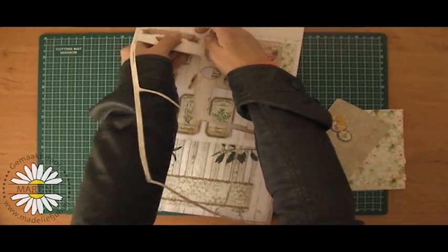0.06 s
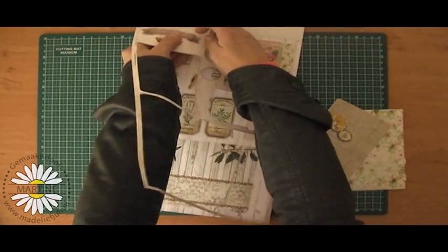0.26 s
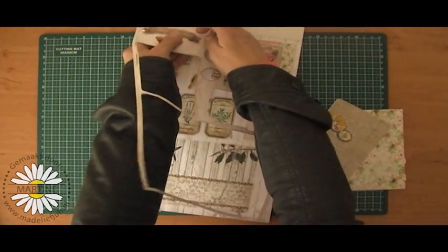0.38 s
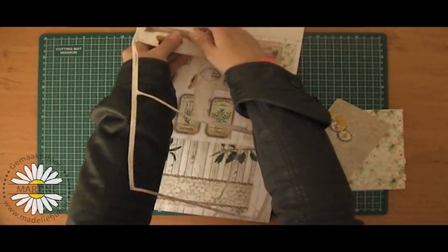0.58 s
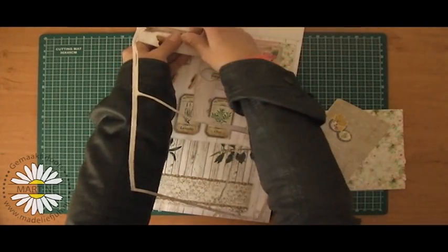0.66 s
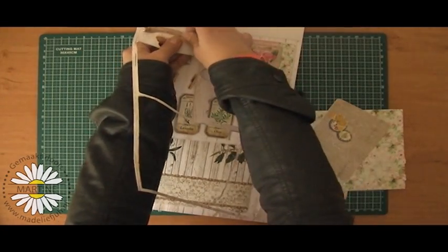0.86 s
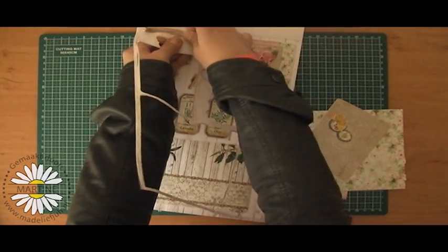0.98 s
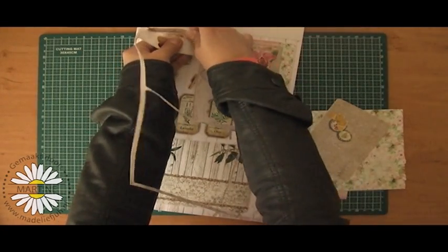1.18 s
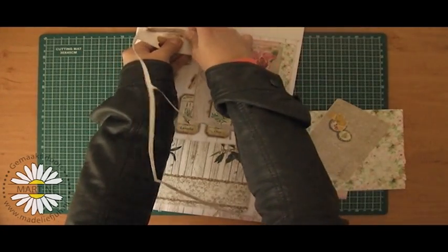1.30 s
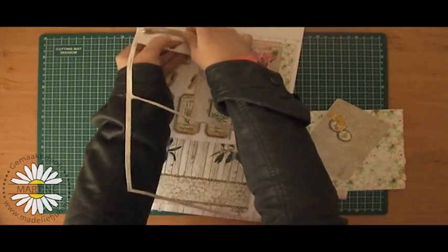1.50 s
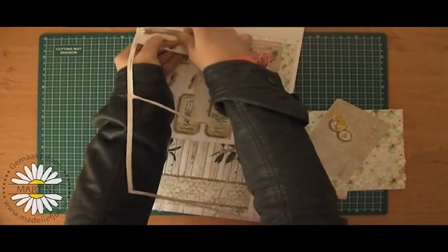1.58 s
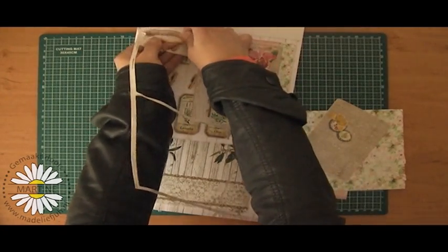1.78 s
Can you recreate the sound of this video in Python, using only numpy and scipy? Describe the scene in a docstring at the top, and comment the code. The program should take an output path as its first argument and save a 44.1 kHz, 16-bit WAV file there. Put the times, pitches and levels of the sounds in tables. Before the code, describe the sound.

Card tabs snapping from a die-cut sheet, close and dry in a small room. Faint rubbing and ticks lead to a volley of loud, bright snaps from 0.23 to 0.42 seconds, with soft thumps. Small ticks at 0.55, 0.71 and 0.95, a quieter snap cluster at 1.08 to 1.17, then a soft rub from 1.38 ending in ticks at 1.48. Sparse faint ticks finish over light hiss and low hum.

```python
"""Faint card rubbing and ticks come first, then from 0.23 s a volley of loud snaps with soft thumps.
Sparse ticks follow, a second snap group near 1.08 s, then a rub that ends in ticks near 1.48 s.
Fingers push card pieces out of a die-cut sheet on a craft table: snaps are coloured noise bursts with echoes
and a small room, rubs are shaped noise, scrapes are narrow-band noise, thumps are decaying sines on the mat.
Faint hiss and a wavering hum run throughout."""
import sys
import numpy as np
from scipy import signal
from scipy.fft import rfft, irfft, next_fast_len
from scipy.io import wavfile
from scipy.ndimage import uniform_filter1d, map_coordinates

SR = 44100
rng = np.random.default_rng(int(sys.argv[2]) if len(sys.argv) > 2 else 0)


def volts_from_decibels(level):
    """Turn decibel levels (scalar or array-like) into linear amplitude factors."""
    exponent = np.asarray(level, float) / 20
    return 10 ** exponent


def inscribe(sig):
    """Save sig as 16-bit PCM at rate SR to the path in sys.argv[1].

    A 1-D sig is mono; a 2-D sig holds one channel per row.
    Samples are clipped to [-1, 1] before scaling.
    """
    pcm = np.round(np.clip(np.atleast_2d(sig).T, -1, 1) * 32767)
    wavfile.write(sys.argv[1], SR, pcm.astype(np.int16))


N = 81585


def unit(x):
    """Scale to rms 1."""
    return x / np.sqrt(np.mean(x ** 2) + 1e-20)


def along(points, hz):
    """Interpolate (freq_hz, value) points on a log frequency axis."""
    point_hz, value = np.transpose(points)
    return np.interp(np.log(hz + 1), np.log(point_hz + 1), value)


def wobble(rate_hz):
    """Smooth random curve with rate_hz knots a second."""
    knots = rng.standard_normal(int(N * rate_hz / SR) + 4)
    return map_coordinates(knots, [np.arange(N) * rate_hz / SR])


def pair(unrelated, spectrum, alike):
    """Turn two unrelated signals into a coloured left and right of the given likeness."""
    length = unrelated.shape[1]
    size = next_fast_len(length + 4096)
    hz = np.fft.rfftfreq(size, 1 / SR)
    turn = np.arccos(np.clip(along(alike, hz), -1, 1)) / 2
    coloured = rfft(unrelated, size) * volts_from_decibels(along(spectrum, hz))
    mid, side = irfft(coloured * [np.cos(turn), np.sin(turn)], size)[:, :length]
    return np.array([mid + side, mid - side])


def causal(gain_db):
    """Minimum-phase impulse response for a gain on an FFT grid, by folding the cepstrum."""
    cepstrum = irfft(np.log(volts_from_decibels(np.maximum(gain_db, -80))))
    half = len(cepstrum) // 2
    cepstrum[1:half] *= 2
    cepstrum[half + 1:] = 0
    return irfft(np.exp(rfft(cepstrum)))


# tabs breaking and card flicking: start_s, relative_level_db, then boost_db of each of the four RINGS
SNAPS = [ (.1140, -31.5, 2.5, 5, 4.5, 8.5), (.1530, -33, 10, 1, 6, 9), (.1620, -38.5, 10, 1.2, 2, 3),
         (0.179, -33, -3.5, 12.5, -13, -26), (.1990, -27, -12, 2, -2, -6), (0.2278, -4.5, 5, 3.5, -1, 10),
         (0.2302, -1.5, -10, -5.5, -8.5, 2), (.2385, -17, 1, -3, -12, -17), (0.2558, 2, 3.5, 7.5, 2, -5),
         (0.3169, 5, 7.5, 10.5, 15, 2), (0.3363, 0, -2.3, -7.5, -6, -0.5),
         (.3431, -8, -23.5, -9.5, -1.5, -20), (.3816, -5.5, -6, 2.5, -2, -29), (0.4182, 0, 1, 7.5, -4, -2),
         (0.536, -30.5, 5, 9, .1, 10.5), (0.5644, -28, -22, 2, 6, 5), (.6770, -40.5, 1, -27, 2, -13),
         (0.7106, -18.5, -5, 5.5, 12.5, 16.5), (0.7134, -20.5, -8.5, 0, 12, 12.5),
         (.9484, -20.5, -7.5, -4, -5, 11), (1.0515, -43, -12, -8, -3, -3), (1.0575, -39, -12, -6, .1, 10),
         (1.0816, -19, -1, -10, -1, 5), (1.0829, -6, -1, 7.5, 10.5, 4.5),
         (1.0857, -8.5, -15.5, 0, 3.5, 11.5), (1.1092, -20.5, 15, 16, 12.5, 12),
         (1.1655, -26.5, -3, 3, -7, -15.5), (1.2180, -37, 2, 1, -14, 0),
         (1.2584, -36.5, 12.5, 1.5, -15, 19.5), (1.3564, -32.5, 2.5, 1.5, -4, 12.5),
         (1.4768, -32.5, -28, -41, -2, 16), (1.4814, -18.5, -11, -2, 3, 22.5),
         (1.4845, -16, 5.5, 9.5, 0, 12), (1.6298, -32, -7, -14.5, 4, 18), (1.651, -38, 3, -19, -6, 9),
         (1.7600, -40, 17.5, 6.5, -11.5, 9)]
# left-right likeness of card sounds: freq_hz, correlation
NEAR_ALIKE = [(60, 0.56), (180, 1), (550, 0.99), (1650, 1), (4970, 0.91), (15000, 0.039)]


def snaps():
    """Each snap is a very short burst with near echoes and a room tail, filtered by the card's colour."""
    level_offset_db, room_db = -3.5, -2.5
    out = np.zeros((2, N + SR))
    for start_s, level_db, *rings_db in SNAPS:
        colour = card_colour(start_s, rings_db)
        colour = 4 * volts_from_decibels(level_db + level_offset_db) * colour / np.linalg.norm(colour)
        heard = near_bursts(volts_from_decibels(room_db) * room())
        heard = signal.fftconvolve(heard, colour[None], axes=1)
        out[:, round(start_s * SR):][:, :heard.shape[1]] += heard
    return pair(out[:, :N], [(100, 0.022)], NEAR_ALIKE)


# spectrum of a snap as heard: freq_hz, density_db
CARD = [(90, -34.5), (200, -22), (340, -24.5), (575, -8), (640, -8.5), (700, -2), (780, -11), (865, 0),
        (990, -14), (1150, -3.5), (1800, -6), (2500, -6.5), (3300, -4.5), (4200, -7.5), (5500, -9),
        (7200, -9.5), (8800, -13.5), (11000, -19.5), (15700, -37)]
# card resonances: freq_hz, half_width_octaves
RINGS = [(820, .33), (1800, .25), (5600, .15), (8900, .18)]
# third ring moves as the sheet bends: time_s, pitch_factor
BEND = [(.26, .9), (.32, .93), (.42, .9), (.71, 1.05), (1.08, 1.08), (1.48, .95)]


def card_colour(start_s, rings_db):
    """Impulse response of the card: its common spectrum plus four bell-shaped resonances."""
    top_share = 0.81  # least share of the highest ring's boost above its pitch
    hz = np.fft.rfftfreq(2048, 1 / SR)
    pitch_factors = [1, 1, np.interp(start_s, *np.transpose(BEND)), 1]
    bumps = []
    for (ring_hz, octaves), factor in zip(RINGS, pitch_factors):
        distance_octaves = np.log2((hz + 1) / ring_hz / factor)
        bumps.append(np.exp(-(distance_octaves / octaves) ** 2 / 2))
    bumps[-1] = np.maximum(bumps[-1], top_share * (hz > RINGS[-1][0]))
    return causal(along(CARD, hz) + rings_db @ np.array(bumps))


# reflections off nearby surfaces: delay_s, level_db
ECHOES = [(.0065, -7), (.0114, -10)]
# extra colour of direct path and echoes: freq_hz, gain_db
NEAR = [(1200, -2), (2400, -4), (3300, 4), (4400, -4), (5600, 2), (7000, -3), (12000, -4)]


def near_bursts(heard):
    """Add the direct burst and its echoes off near surfaces: separate noise with a fast rise and decay."""
    t60_s, rise_s = .0062, .0008  # envelope before the spectrum is evened
    t = np.arange(256) / SR
    near = rfft(causal(along(NEAR, np.fft.rfftfreq(len(t), 1 / SR))))
    envelope = volts_from_decibels(-60 * t / t60_s) * (1 - np.exp(-t / rise_s))
    burst = rfft(rng.standard_normal((len(ECHOES) + 1, 2, len(t))) * envelope)
    # even spectrum, random fine shape
    even = burst / np.sqrt(uniform_filter1d(np.abs(burst) ** 2, size=9))
    copies = irfft(near * even)
    for (delay_s, echo_db), copy in zip([(0, 0), *ECHOES], copies):
        heard[:, round(delay_s * SR):][:, :len(t)] += volts_from_decibels(echo_db) * copy
    return heard


# room decay: freq_hz, t60_s
ROOM = [(300, 0.28), (800, 0.18), (2000, 0.17), (5500, 0.18), (14000, 0.19)]


def room():
    """Two unrelated room answers, lumpy at first; each frequency dies at its own speed."""
    rise_s, lumps_start_db, lumps_fade_s = .01, 4, .06
    hz, t, z = signal.stft(rng.standard_normal((2, SR // 3)), SR, nperseg=256)
    decay = volts_from_decibels(-60 * t / along(ROOM, hz)[:, None])
    tail = signal.istft(z * decay, SR, nperseg=256)[1]
    t = np.arange(tail.shape[1]) / SR
    lumps_db = lumps_start_db * np.exp(-t / lumps_fade_s) * wobble(500)[:len(t)]
    tail = tail * (1 - np.exp(-t / rise_s)) * volts_from_decibels(lumps_db)
    return tail / np.linalg.norm(tail[0])


# card sliding under the fingers, one list a stroke: time_s, level_db
RUB = [
    [(0, -45.5), (.05, -45.5), (.1, -54), (.14, -55.5), (.2, -62)],
    [(.6, -63), (.654, -64), (.678, -54), (.708, -51.5)],
    [(.76, -49.5), (.82, -62.5), (.9, -63)],
    [(1.375, -60), (1.395, -53.5), (1.43, -51.5), (1.46, -53), (1.482, -42)],
    [(1.52, -50), (1.58, -58), (1.66, -58), (1.72, -76)],
]
# rub spectrum: freq_hz, density_db
RUB_COLOUR = [(180, -53), (350, -19.5), (611, -7), (880, -7.5), (1000, -10), (1330, -10), (1880, -7),
              (3300, -6), (4300, -5), (6500, -9), (10000, -12), (15700, -32)]


def rubbing():
    """Sliding card: a soft, slightly lumpy hiss following the strokes."""
    t = np.arange(N) / SR
    stroke = sum(volts_from_decibels(np.interp(t, *np.transpose(rows), left=-120, right=-120)) for rows in RUB)
    lumps = volts_from_decibels(1.45 * wobble(49.0) + 1.8 * wobble(420))
    noise = unit(pair(rng.standard_normal((2, N)), RUB_COLOUR, NEAR_ALIKE))
    return uniform_filter1d(stroke, size=300) * lumps * noise


# card scraping or ringing on: start_s, length_s, level_db, centre_hz, width_hz
SCRAPES = [ (.424, .04, -36, 1900, 300), (.258, .022, -30, 1800, 350), (1.482, .035, -47, 8800, 900),
           (1.383, .065, -51, 3300, 300), (1.56, .04, -60, 3400, 500), (.002, .05, -51, 870, 110),
           (.001, .045, -55, 710, 90), (1.484, .04, -47, 700, 70), (1.5, .05, -58, 1150, 80),
           (1.084, .04, -40, 875, 70), (.246, .01, -30, 3400, 500)]


def scrapes():
    """Card scraping or ringing on: band-passed noise under a short quick-rising arch."""
    out, t = np.zeros(N), np.arange(N) / SR
    for start_s, length_s, level_db, centre_hz, width_hz in SCRAPES:
        band_hz = [centre_hz - width_hz / 2, centre_hz + width_hz / 2]
        sos = signal.butter(2, band_hz, "band", fs=SR, output="sos")
        ring = signal.sosfilt(sos, rng.standard_normal(N))
        progress = np.clip((t - start_s) / length_s, 0, 1)
        out += volts_from_decibels(level_db) * unit(ring) * np.sin(np.pi * progress ** .5)
    return out


# sheet flexing against the mat: start_s, envelope_peak_db, pitch_hz
THUMPS = [(0.251, -42, 143), (.31, -61, 45), (0.328, -44.5, 153.6), (0.414, -54, 120), (1.103, -50, 112),
          (1.106, -45.5, 197), (1.099, -44.5, 337), (1.172, -59, 44.9), (0.109, -49, 486),
          (1.484, -51, 151), (1.49, -47, 360), (1.629, -53, 524)]


def thumps():
    """Sheet flexing on the mat: low sines that swell and die in a few cycles."""
    cycles = 3.5  # span of four envelope time constants
    out, t = np.zeros(N + SR), np.arange(SR // 4) / SR
    for start_s, peak_db, pitch_hz in THUMPS:
        u = t * pitch_hz / cycles * 4
        envelope = np.e * u * np.exp(-u)  # peaks at 1
        out[round(start_s * SR):][:len(t)] += volts_from_decibels(peak_db) * envelope * np.sin(2 * np.pi * pitch_hz * t)
    return out[:N]


# hiss spectrum: freq_hz, density_db
HISS = [(15, -50.5), (30, -14.5), (60, -7.5), (165, -6), (261, -5.5), (351, -14), (500, -9.5), (800, -18),
        (1000, -19), (1300, -15), (2190, -16), (3300, -15.5), (4300, -17), (8000, -22.5), (15700, -27)]
# hiss left-right likeness: freq_hz, correlation
HISS_ALIKE = [(60, 0.92), (180, 0.82), (550, 0.74), (1650, 0.4), (4970, 0.72), (15000, -0.59)]
# hum partials: freq_hz, mean_level_db
HUM = [(77.5, -71), (155, -67)]


def background():
    """Steady coloured-noise hiss and a low hum of sines with wavering levels."""
    hiss_db, waver_db = -59.5, 3
    t = np.arange(N) / SR
    hum = np.zeros(N)
    for freq_hz, level_db in HUM:
        level = np.sqrt(2) * volts_from_decibels(level_db + waver_db * wobble(8.22))
        hum += level * np.sin(2 * np.pi * (freq_hz * t + rng.random()))
    hiss = unit(pair(rng.standard_normal((2, N)), HISS, HISS_ALIKE))
    return volts_from_decibels(hiss_db) * hiss + hum


def scene():
    """All sources, slightly right of centre."""
    left_db = -0.21
    mix = snaps() + rubbing() + scrapes() + thumps() + background()
    return mix * volts_from_decibels([[left_db], [-left_db]])


def top_cut(x):
    """Nothing passes above the cut-off."""
    return signal.sosfilt(signal.butter(12, 15830, fs=SR, output="sos"), x)


def record(dry):
    """Clip at full scale and finish the mix."""
    mix = np.clip(dry, -1, 1)
    return top_cut(mix)


dry = scene()
out = record(dry)
inscribe(out)
```